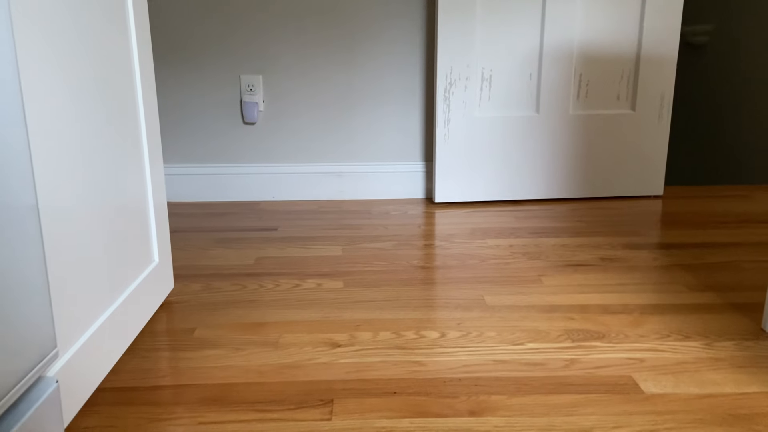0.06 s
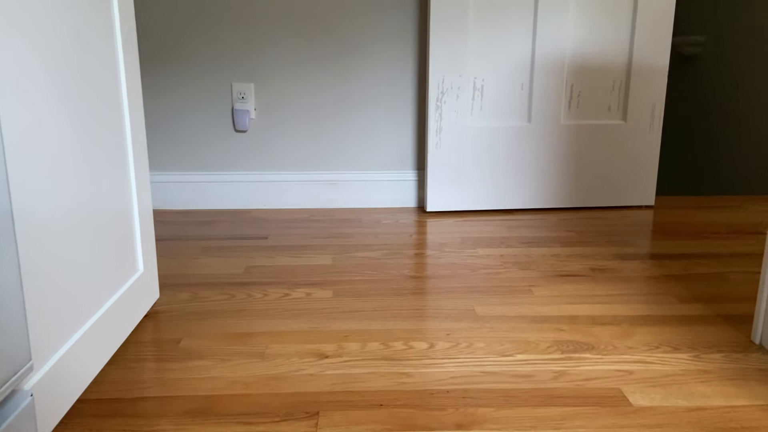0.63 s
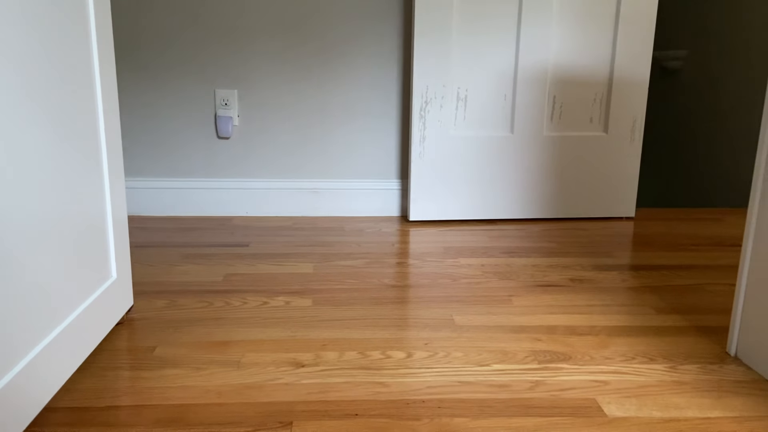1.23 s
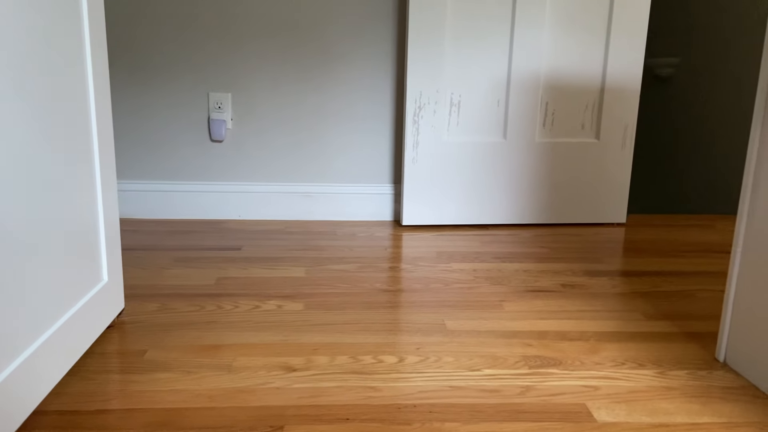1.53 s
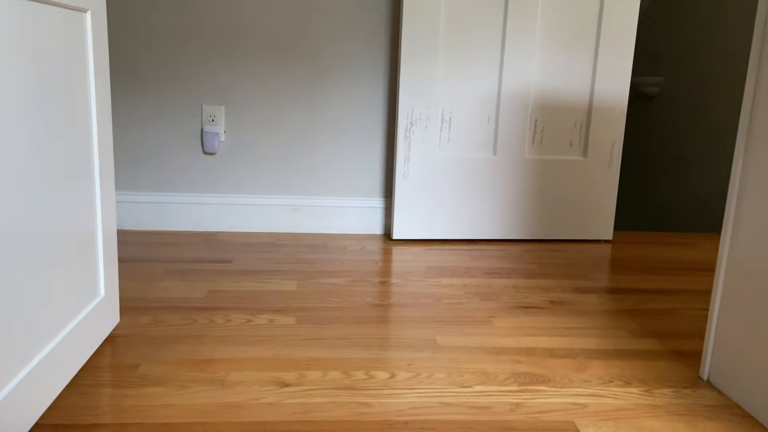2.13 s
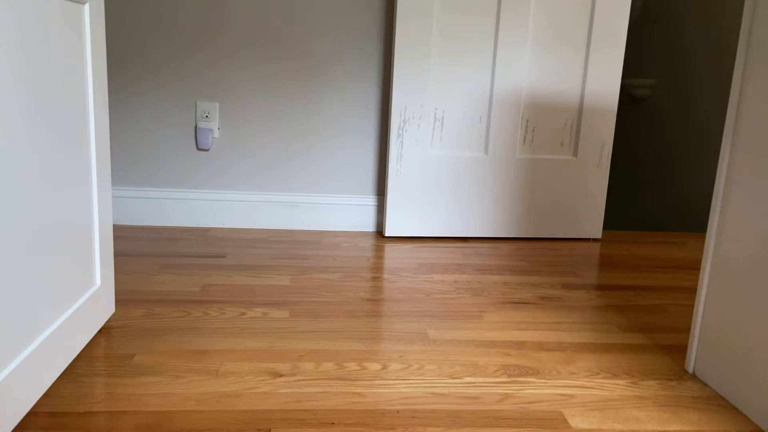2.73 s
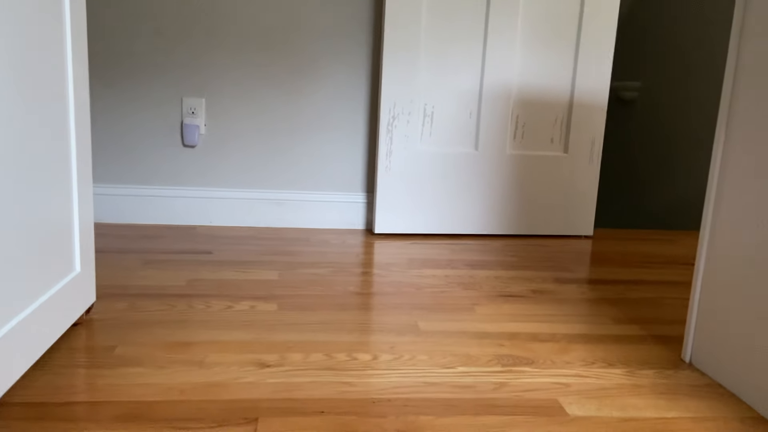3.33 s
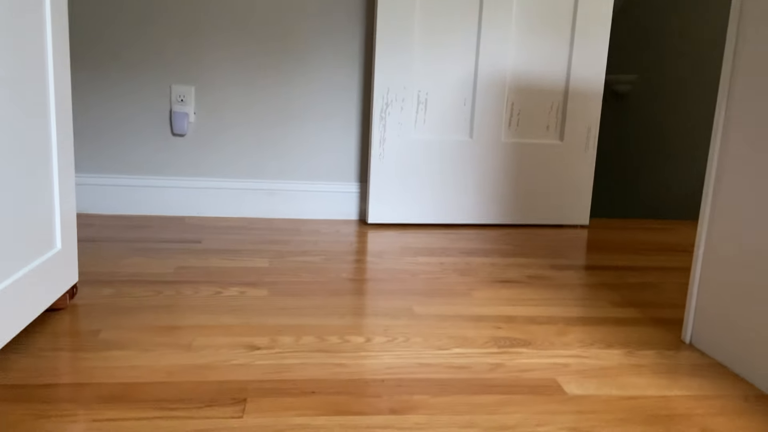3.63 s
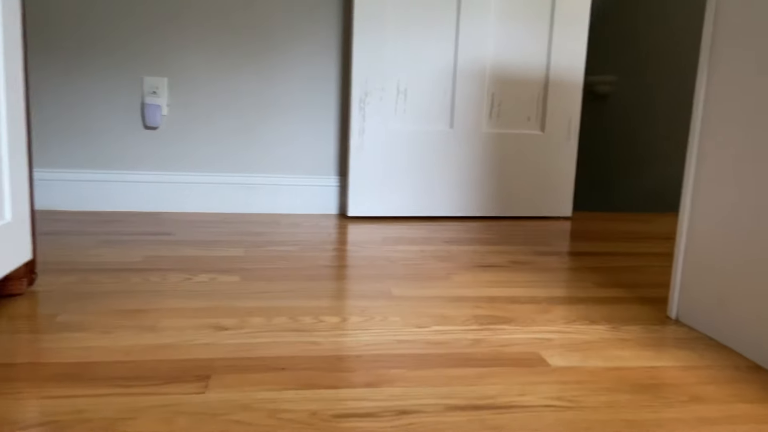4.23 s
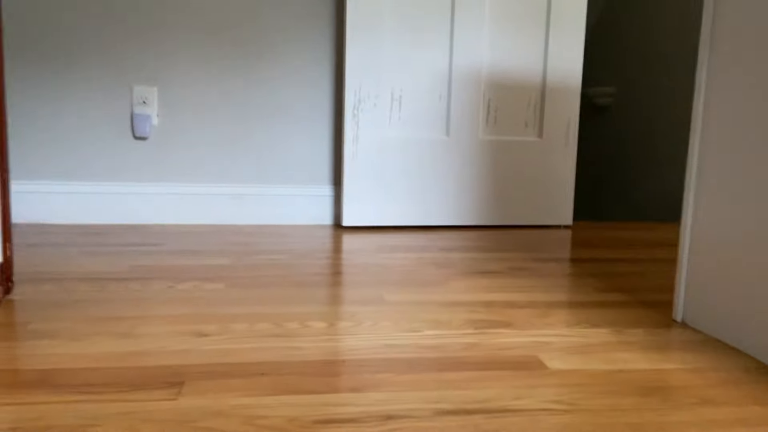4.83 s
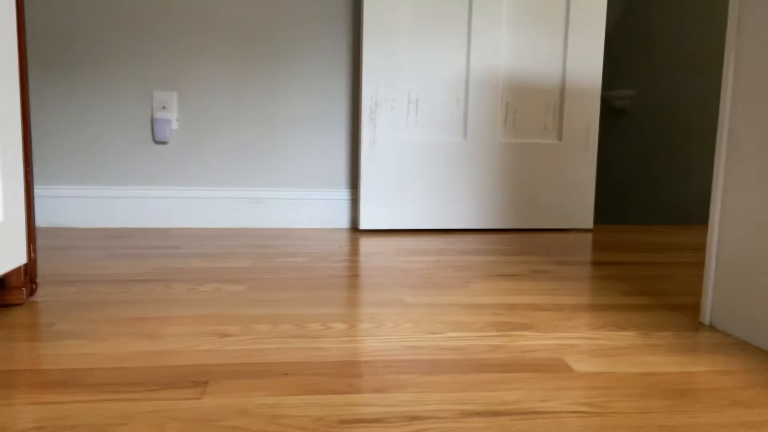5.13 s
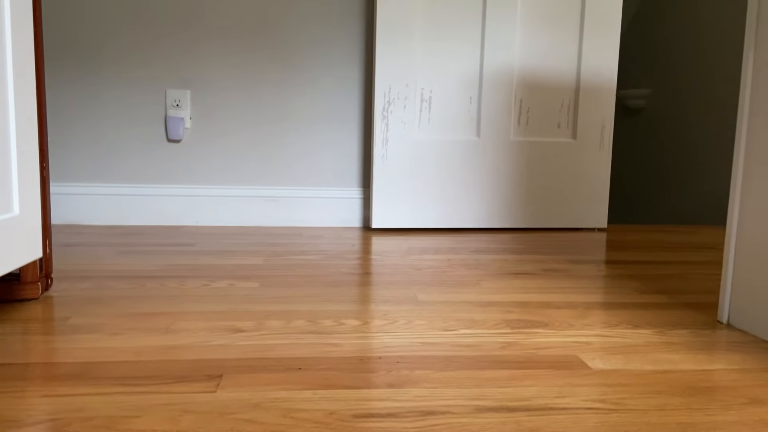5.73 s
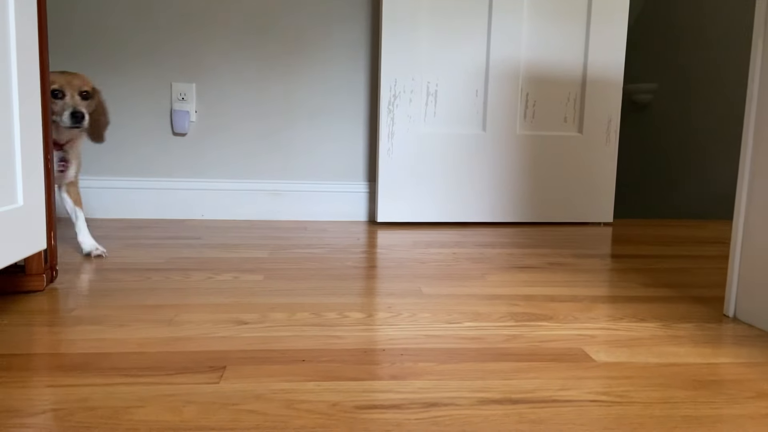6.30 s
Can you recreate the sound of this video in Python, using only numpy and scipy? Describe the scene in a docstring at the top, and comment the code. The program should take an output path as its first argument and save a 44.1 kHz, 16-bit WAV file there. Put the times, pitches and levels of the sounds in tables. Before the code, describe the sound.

A dog moves about on a wooden floor in a slightly echoing kitchen. In the first second, a few claw taps and light paw scuffs mix with hollow wooden bumps from across the room, and metal collar tags clink brightly from about 0.3 to 1 second. A short, heavy floor thump comes at 1.3 seconds. At 1.9 seconds a wooden door knocks hard, the loudest sound, with a few lighter rebounds. From 2.3 to about 5.2 seconds, small dry creaks tick close by, thickest between 3 and 4 seconds, while paws stick and slide, most strongly around 4 seconds. From 4.5 seconds until the end at about 6.4, claws click irregularly, heard mostly from around a corner, with more hollow bumps near 5 and 5.5 seconds. Soft low thuds recur throughout, over a quiet house rumble and the faint rub of a hand on the microphone.

```python
"""A bare kitchen with a wooden floor, where a dog shuffles about.
Its claws tap the boards, its paws stick and slip as they slide, and its metal collar tags clink.
The floor thumps, a wooden door knocks, and hollow bumps come from across the room, which echoes.
Small dry creaks and soft thuds sound close by. Underneath, the house hums with a low rumble
and a hand rubs on the camera that holds the two microphones."""
import sys
import numpy as np
from scipy import signal
from scipy.fft import rfft, irfft
from scipy.io import wavfile
from scipy.ndimage import uniform_filter1d

SR = 44100
rng = np.random.default_rng(int(sys.argv[2]) if len(sys.argv) > 2 else 0)


def generate_wav(sig):
    """Save sig (samples, or channels by samples) to the path in sys.argv[1] as 16-bit PCM at SR."""
    pcm = np.round(np.clip(np.atleast_2d(sig).T, -1, 1) * 32767).astype(np.int16)
    wavfile.write(sys.argv[1], SR, pcm)


N = 280476
SIZE = 8192  # samples in one short sound
T = np.arange(SIZE) / SR
HZ, TRACK_HZ = np.fft.rfftfreq(SIZE, 1 / SR), np.fft.rfftfreq(N, 1 / SR)
USUAL_DB = -46  # a step above this level counts as a hard one
# tone of the paws as the dog moves about: t/s, body (lows)/dB, air (highs)/dB
PAW_TONE = [(0.1, 0, -19.5), (0.5, -0.5, -29), (1.0, 1.5, -12), (1.32, 4, -27), (1.36, 20.5, -14.5),
            (1.54, 5, -10.5), (2.1, 6, -24.5), (2.8, -7.5, -23), (3.6, -1, -21.5), (4.05, -12, -23.5),
            (4.25, 0.5, -16), (5.0, 0.5, -29), (5.5, -10, -26), (6.3, -13, -24)]


def amp(db):
    return 10 ** (np.asarray(db) / 20)


def read(points, hz):
    """Joins (frequency, value) points on a log-frequency axis."""
    f, value = np.transpose(points)
    return np.interp(np.log(hz + 1), np.log(f + 1), value)


def at(curve, s, column=1):
    """Reads one column of a curve at time s."""
    columns = np.transpose(curve)
    return np.interp(s, columns[0], columns[column])


def add(mix, s, sound):
    """Lays a sound into the mix at time s."""
    part = mix[..., max(round(s * SR), 0):][..., :sound.shape[-1]]
    part += sound[..., :part.shape[-1]]


def coloured(x, db):
    """Filters a short sound by the gains db at HZ, so that any ringing follows the hit."""
    log_gain = np.log(amp(np.r_[db, db[-2:0:-1]]))
    return irfft(rfft(x) * np.exp(np.conj(signal.hilbert(log_gain)))[:len(db)])


def tinted(x, points):
    """Filters a whole track by points of f/Hz, gain/dB."""
    return irfft(rfft(x) * amp(read(points, TRACK_HZ)), N)


def levelled(x, band=(20, 20000), size=256):
    """Scales a sound so that its loudest moment within a band has level 1 (rms)."""
    part = irfft(rfft(x) * ((HZ > band[0]) & (HZ < band[1])))
    power = uniform_filter1d(np.atleast_2d(part ** 2).mean(0), size)
    return x / np.sqrt(power.max() + 1e-20)


def octaves_from(hz):
    return np.log2((HZ + 1) / hz)


def grains(per_s, spread_db):
    """A train of tiny slips of uneven size."""
    size = amp(spread_db * np.minimum(rng.exponential(1, SIZE), 4))
    return size * rng.standard_normal(SIZE) * (rng.random(SIZE) < per_s / SR)


def stereo_noise(length):
    """Noise as two close microphones hear it: most alike in the bass."""
    # how alike left and right are: f/Hz, likeness (0 to 1)
    likeness = [(60, 0.75), (200, 0.65), (500, 0.49), (1400, 0.03), (2500, 0.25), (4200, 0.5), (6000, 0.37)]
    a, b = rfft(rng.standard_normal((2, length)))
    same = read(likeness, np.fft.rfftfreq(length, 1 / SR))
    return irfft(np.array([a, same * a + np.sqrt(1 - same ** 2) * b]), length)


def room(x, early_db, tail_db, early_s):
    """Quick echoes from floor and cupboards, then a tail whose highs die first."""
    # how long the kitchen rings: f/Hz, time to fade by 60 dB/s
    fade_times = [(100, 0.96), (400, 0.57), (900, 0.65), (2000, 0.56), (5000, 0.6), (11000, 0.42),
                  (16000, 0.12)]
    t = np.arange(SR) / SR
    early = stereo_noise(SR) * np.exp(-t / early_s) * (t > .001)
    hz, when, bands = signal.stft(stereo_noise(SR), SR, nperseg=256)
    bands *= amp(-60 * when / read(fade_times, hz)[:, None])
    tail = signal.istft(bands, SR, nperseg=256)[1][:, :SR] * (1 - np.exp(-t / 0.006))
    echo = amp(early_db) * early / np.linalg.norm(early[0])
    echo += amp(tail_db) * tail / np.linalg.norm(tail[0])
    return signal.fftconvolve(x[None], echo, axes=1)[:, :N]


def room_tone(level_db=-65):
    """Low steady rumble of the house under a faint hiss."""
    # tone of the quiet house: f/Hz, level/dB
    house_tone = [(20, -2.5), (40, -15.5), (60, 9), (80, -3.5), (115, 2.5), (160, -21), (300, -14),
                  (700, -15.5), (1500, -38.5), (4000, -29.5), (9000, -35.5), (16000, -77)]
    rumble = tinted(stereo_noise(N), house_tone)
    return amp(level_db) * rumble / rumble.std()


def hand_rub(gain_db=-3):
    """Low rubbing that comes and goes as a hand shifts on the camera."""
    # strength of the rubbing: t/s, level/dB
    strength = [(0.0, -45.5), (0.35, -61), (0.78, -56), (1.15, -65.5), (1.75, -65.5), (1.95, -45.5),
                (2.2, -68.5), (3.4, -65.5), (3.7, -61), (4.05, -57.5), (4.4, -65), (6.0, -64), (6.36, -74)]
    # its tone: f/Hz, level/dB
    rub_tone = [(25, -53), (55, 4.5), (130, 1.5), (200, -2.5), (400, -8.5), (800, -10), (2000, -19.5),
                (8000, -31.5)]
    rub = tinted(stereo_noise(N), rub_tone)
    return amp(gain_db + at(strength, np.arange(N) / SR)) * rub / rub.std()


def soft_notes(blows, decay_s, waver, rise_s=.006):
    """Soft blows that each ring one short, slightly unsteady note."""
    out = np.zeros(N)
    for s, db, hz, *_ in blows:
        drift = uniform_filter1d(rng.standard_normal(SIZE), size=200) * np.sqrt(200)
        ring = np.sin(2 * np.pi * np.cumsum(hz * (1 + waver * drift)) / SR)
        add(out, s, amp(db) * levelled(ring * (1 - np.exp(-T / rise_s)) * np.exp(-T / decay_s)))
    return out


def thuds():
    """Weight comes down on the floor and shakes the camera."""
    # soft low thuds: t/s, level/dB, f/Hz
    blows = [(0.105, -48, 143), (0.11, -39.5, 75.4), (0.644, -56, 198), (0.709, -45.5, 79),
             (1.385, -44, 72), (1.66, -48.5, 61), (1.914, -52, 133), (1.925, -49, 75), (1.92, -50, 253),
             (1.995, -56, 288), (2.052, -47.5, 315), (2.16, -47, 382), (2.524, -58, 256),
             (2.914, -52, 61.6), (2.938, -52, 80), (2.996, -51.5, 77), (3.255, -58, 125),
             (3.619, -54.5, 130), (4.12, -55, 125), (4.78, -56, 81.4), (5.89, -59, 93), (6.249, -56, 62),
             (6.325, -54, 70)]
    out = soft_notes(blows, decay_s=0.0078, waver=.1)
    return out + room(out, early_db=-9, tail_db=-11, early_s=.015)


def bumps(gain_db=-7.5):
    """Hollow wooden notes from across the room, each with a rough knock and a higher clack."""
    # bumps on wood: t/s, level/dB, note/Hz, clack against level/dB, clack/Hz
    blows = [(0.101, -38.5, 693, -7, 1760), (0.456, -50, 704, 8, 2040), (0.533, -39, 741, -14, 1990),
             (0.933, -41, 711, -6, 1877), (3.625, -44, 907, 3.5, 3050), (5.022, -43.5, 947, -4, 2990),
             (5.098, -51.5, 970, 3.5, 2970), (5.497, -41.5, 892, -4.5, 2890)]
    out = amp(-3) * soft_notes(blows, decay_s=.0065, waver=.05)
    for s, db, hz, clack_db, clack_hz in blows:
        knock_tone = -20 * np.log10(1 + (octaves_from(hz) / 0.28) ** 2)
        knock = coloured(grains(2500, 1.6) * np.exp(-T / 0.009), knock_tone)
        add(out, s, amp(db - 2) * levelled(knock))
        clack_tone = -10 * np.log10(1 + (octaves_from(clack_hz) / 0.028) ** 2)
        clack_tone += read([(4000, -6.5), (9000, -0.5)], HZ)
        clack = coloured(grains(5500, 1.6) * np.exp(-T / 0.0061), clack_tone)
        add(out, s, amp(db + clack_db) * levelled(clack))
    return amp(gain_db) * (out + room(out, early_db=0.5, tail_db=-2, early_s=0.016))


def creaks(gain_db=-8.5, snap_s=0.0031, wood_db=-29, wood_s=0.0072):
    """Single slips in wood close by; the wood bends in waves that bring the highs before the lows."""
    # dry creaks: t/s, level/dB, treble/dB, delay at 1 kHz/s
    slips = [(0.642, -43.5, 0.5, 0.00197), (0.703, -30.5, -8.5, 0.00218), (2.29, -37, 0.5, 0.00172),
             (2.3533, -41.5, 3, 0.00156), (2.3836, -35, 1.5, 0.0016), (2.4195, -44.5, -10, 0.00137),
             (2.457, -42.5, 4, 0.00126), (2.6674, -42, 2, 0.00168), (2.9108, -36.5, 8.5, 0.0015),
             (2.986, -41, 2, 0.0021), (3.069, -52, 8, .003), (3.0853, -46, 9.5, .003),
             (3.0899, -45, -13, 0.0021), (3.1447, -48, -21, 0.00217), (3.186, -54, -18, 0.0037),
             (3.2086, -44.5, -4, 0.0031), (3.237, -47.5, -2, 0.0055), (3.3173, -45, 8, 0.00241),
             (3.368, -46.5, 13.5, 0.00256), (3.386, -50.5, 14, 0.0056), (3.409, -47, 14.5, .0022),
             (3.4361, -45, 9, .0024), (3.447, -51, 5, 0.00207), (3.5106, -46, 9, 0.0054),
             (3.5278, -50, 8, 0.0031), (3.554, -43.5, 6, 0.00243), (3.573, -48, 4, 0.00295),
             (3.627, -53, 7, .003), (3.639, -41, 2, 0.00288), (3.6674, -41.5, 8, 0.0043),
             (3.6867, -43.5, 11, 0.0049), (3.714, -43, 9, 0.0028), (3.7285, -46, 0, 0.0041),
             (3.7424, -47, -5, .0034), (3.7713, -45.5, 12, 0.00201), (3.785, -48, 9, .0036),
             (3.809, -43.5, 9, 0.0027), (3.8434, -46, 7, 0.00195), (3.8526, -43.5, 2, 0.0033),
             (3.8882, -49, 26, 0.00189), (3.905, -53, -5, 0.00363), (3.9574, -47, 2, 0.00256),
             (4.0118, -42, 13, 0.0026), (4.056, -42.5, 9, .0024), (4.069, -46.5, 6, 0.0023),
             (4.0805, -49, 12, 0.0019), (4.0908, -46.5, 2, 0.0034), (4.1888, -44.5, 8, 0.0019),
             (4.48, -50, 9, 0.00285), (4.4958, -43, 12, 0.00227), (4.6004, -38.5, 14.5, 0.00168),
             (4.6837, -39, 8.5, 0.00195), (4.829, -42, 6, 0.00298), (4.928, -46, 2, 0.00298),
             (4.99, -44.5, 4, 0.00159), (5.065, -43, 6, .0026), (5.115, -39.5, 0, 0.00162),
             (5.2344, -48.5, 1.5, .0013), (5.992, -52.5, 0, 0.00144)]
    # tone of a creak: f/Hz, level/dB
    creak_tone = [(80, 3.5), (250, 3.5), (500, 15.5), (900, 10), (1600, 8.5), (3000, -0.5), (7000, -6),
                  (11000, -16), (16000, -26)]
    out = np.zeros((2, N))
    dull = read([(150, 6), (800, 0), (3000, -22)], HZ)
    for s, db, treble_db, lag_s in slips:
        slip = 0.11 * rng.standard_normal((2, SIZE)) * np.exp(-T / snap_s)
        slip[:, 0] += 1  # the first sharp snap
        slip += amp(wood_db) * coloured(rng.standard_normal(SIZE) * np.exp(-T / wood_s), dull)
        tone = read(creak_tone, HZ) + read([(1500, 0), (4000, treble_db)], HZ)
        bending = np.exp(-4j * np.pi * lag_s * np.sqrt(1000 * HZ))
        click = irfft(rfft(coloured(slip, tone)) * bending)
        add(out, s, amp(db) * levelled(click, band=(400, 3000), size=176))
    return amp(gain_db) * out


def struck_wood(blows, notes, crack_db, crack_s, spread, top_db, low_hz, rise_s):
    """A blow rings the wood's own notes; long contact weakens the highs, a hit near the edge the lows."""
    out = np.zeros((2, N))
    for s, db, contact_s, low_db in blows:
        ring = amp(crack_db) * stereo_noise(SIZE) * np.exp(-T / crack_s)
        for hz, note_db, fade_s in notes:
            # each note reaches the two microphones a little out of step
            turns = rng.random() + spread * rng.uniform(1.0, 1.64) * np.array([[0], [1]])
            ring += amp(note_db - 60 * T / fade_s) * np.sin(2 * np.pi * (hz * T + turns))
        tone = -10 * np.log10(1 + (2 * np.pi * HZ * contact_s) ** 2)
        tone += read([(low_hz, low_db), (1.4 * low_hz, 0), (5000, 0), (10000, top_db)], HZ)
        add(out, s, amp(db) * levelled(coloured(ring * (1 - np.exp(-T / rise_s)), tone)))
    return out


def floor_thump():
    """A short, heavy thump in the boards, with lighter hits around it."""
    # blows on the floor: t/s, level/dB, contact time/s, lows/dB
    blows = [(1.321, -47.5, 0.00049, 0), (1.3315, -31, 0.00083, 0.5), (1.356, -45, 0.00023, -9),
             (1.366, -46.5, 0.00017, -10), (1.382, -43.5, 0.000084, -10.5)]
    # notes of the boards: f/Hz, level/dB, time to fade by 60 dB/s
    notes = [(128, -3.5, 0.089), (298, 0, 0.028), (545, 5.5, 0.024), (625, -0.5, 0.056), (710, 0, 0.054),
             (854, -10.5, 0.077), (1072, -8, 0.1), (1220, -20, 0.049), (1770, -13, 0.11)]
    out = struck_wood(blows, notes, crack_db=-1, crack_s=0.016, spread=0.08,
                      top_db=-30, low_hz=580, rise_s=.002)
    return amp(-1) * out + room(out.mean(0), early_db=-6, tail_db=-6, early_s=0.017)


def door_knock():
    """A hard wooden knock and its rebounds; the room takes up some notes more than others."""
    # knocks of the door: t/s, level/dB, contact time/s, lows/dB
    blows = [(1.9008, -19.5, 0.000087, -0.5), (1.926, -37, 0.0003, 2), (2.054, -44, 0.0007, 0),
             (2.152, -39, 0.000024, -4)]
    # notes of the door: f/Hz, level/dB, time to fade by 60 dB/s
    notes = [(350, -17, 0.053), (724.5, -4.5, 0.12), (757, 3, 0.051), (836, -13.5, 0.126),
             (878, -8.5, 0.055), (940, -6, 0.076), (995, 4.5, 0.026), (1108, -1, 0.031), (1230, -1, 0.023),
             (1390, -6, 0.027), (1500, -20, 0.13), (1796, -19.5, 0.2), (1912, -5, 0.03),
             (1990, -23.5, 0.17), (2275, -23, 0.065), (2360, -17, 0.053), (2570, -11, 0.023)]
    # what the room takes up: f/Hz, gain/dB
    into_room = [(350, -8), (720, 0.5), (850, 4), (1000, -7), (1150, -2), (1800, 5.5), (2030, 11.5),
                 (2400, 5.5), (4000, 4)]
    out = struck_wood(blows, notes, crack_db=-11, crack_s=0.012, spread=0.19,
                      top_db=-5, low_hz=780, rise_s=.005)
    return amp(-1) * out + room(tinted(out.mean(0), into_room), early_db=-9, tail_db=-6.5, early_s=0.02)


def collar_tags(gain_db=-3.5, upper_s=0.003, lower_s=0.0019, tick_s=0.002):
    """Two small metal discs touch with a bright tick and stop each other's ringing at once."""
    # clinks: t/s, upper ring/dB, lower ring/dB, lower ring/Hz, room share/dB, tick share/dB
    clinks = [(0.009, -58, -59, 7700, 15, -2), (0.318, -58.5, -54.5, 7670, 11, 12),
              (0.364, -52, -52, 8340, 7, 12), (0.455, -51, -58, 8300, -1, 12),
              (0.465, -42, -42, 8500, 3.5, 9), (0.477, -46, -34, 8380, -4.5, -7),
              (0.6383, -30, -73, 7900, -5, -6), (0.652, -30, -72, 7950, -22, -6),
              (0.747, -59, -48, 7400, 6, 14), (0.758, -66, -49, 8100, 4, 5),
              (0.791, -45, -60, 8450, -3, 14), (0.867, -48, -29, 8360, -6, -5),
              (0.875, -45, -46, 8450, -14, 9), (0.882, -52, -40, 8300, -15, -7),
              (0.945, -41, -33, 8040, -5, 5.5), (0.957, -37.5, -40, 8500, 1.5, 5.5),
              (0.981, -47, -40, 8200, -13, -8), (1.026, -64, -65, 7930, 17, 6),
              (1.789, -96, -66.5, 7630, 13, 3)]
    near, far = np.zeros((2, N))
    for s, db, lower_ring_db, lower_hz, room_db, tick_db in clinks:
        upper_hz = 11390 * (1 + 0.003 * rng.uniform(-1, 1))
        lower_db = lower_ring_db - db
        ring = np.sin(2 * np.pi * upper_hz * T) * np.exp(-T / upper_s)
        ring += amp(lower_db) * np.sin(2 * np.pi * lower_hz * T) * np.exp(-T / lower_s)
        ring *= 1 - np.exp(-(T / .0003) ** 2)
        # the tick is noise spread round the two rings
        bright = read([(4000, -30), (8400, max(lower_db, -20)), (11400, 0), (12800, -1), (16000, -8)], HZ)
        tick = coloured(rng.standard_normal(SIZE) * np.exp(-T / tick_s), bright)
        clink = amp(db) * (2 * ring + amp(tick_db) * tick)
        add(near, s, clink)
        add(far, s, amp(room_db) * clink)
    return amp(gain_db) * (near + room(far, early_db=-5, tail_db=-1, early_s=.012))


def claw_on_board(force, db, body_db, air_db, extra_db=0):
    """A claw's push turns into sound, dull or bright as the paw lands; hard steps ring more."""
    # tone of claw on wood: f/Hz, level/dB
    claw_tone = [(60, -8.5), (150, -4), (350, 2.5), (600, -2.5), (900, 4), (1400, 5), (2200, 6), (3100, 2),
                 (4800, 2.5), (6400, -2), (7400, 0), (8500, 7), (9500, 16.5), (11000, 13.5), (15500, 8.5)]
    # pitches that a claw sets ringing: f/Hz, height before scaling by the step's strength/dB
    rings = [(3050, 3.5), (3600, 2.5), (4730, 4), (6750, 1.5), (7900, 2.5)]
    tilt = read([(1300, body_db), (3000, 0), (7000, 0), (10500, air_db)], HZ)
    peaks = sum(height * np.exp(-(octaves_from(hz) / 0.082) ** 2) for hz, height in rings)
    bite = 0.03 * max(db - USUAL_DB, 0) * peaks
    tone = read(claw_tone, HZ) + tilt + bite + extra_db
    return amp(db) * levelled(coloured(force, tone), band=(2500, 8000))


def small_steps(start_s=2.65, end_s=6.1, count=14, db=-51, length_s=0.14, ring_hz=5000):
    """Lists the dog's light, restless scuffs, at an uneven pace."""
    jitter, size = rng.random((count, 2)).T
    times = start_s + (end_s - start_s) * (np.arange(count) + jitter) / count
    levels = db + 2 * (2 * size - 1)
    return [(s, level, length_s, ring_hz) for s, level in zip(times, levels)]


def paw_scuffs(gain_db=-8, ring_octaves=0.59):
    """A sliding paw sticks and slips; each stroke swells and eases, and hard ones sound thinner."""
    # slides: t/s, level/dB, length (cut off at SIZE samples)/s, ringing pitch/Hz
    slides = [(0.003, -43.5, 0.11, 3570), (0.227, -47.5, 0.11, 4550), (0.462, -42.5, 0.034, 5150),
              (0.755, -53, 0.31, 5000), (0.871, -49.5, 0.077, 5200), (0.922, -47, 0.05, 5000),
              (1.354, -51.5, 0.035, 4000), (2.11, -47.5, 0.093, 5170), (2.40, -50.5, 0.073, 4800),
              (2.615, -50, 0.12, 5060), (2.76, -77, 0.091, 5400), (2.86, -51.5, 0.11, 3400),
              (2.972, -46.5, 0.064, 4900), (3.17, -55, 0.28, 3600), (3.236, -44, 0.075, 4700),
              (3.402, -59, 0.031, 5600), (3.552, -41, 0.16, 3980), (3.62, -46.5, 0.24, 3160),
              (3.745, -47, 0.19, 4730), (3.89, -40.5, 0.05, 5260), (3.928, -35.5, 0.058, 4460),
              (4.0, -39.5, 0.11, 5140), (4.223, -33.5, 0.061, 4270), (4.471, -52, 0.035, 4500),
              (4.6845, -46.5, 0.23, 2700), (4.77, -53, 0.038, 4950), (4.881, -43, 0.043, 4460),
              (5.005, -39, 0.054, 3000), (5.32, -47, 0.071, 4570), (5.463, -48, 0.066, 2800),
              (5.55, -52, 0.086, 3000), (5.667, -56, 0.17, 3400), (5.791, -51.5, 0.021, 3000),
              (6.119, -51, 0.094, 5240), (6.326, -45, 0.018, 4500)]
    spots = np.zeros((2, N))  # two places on the floor, each with its own echoes
    soft_top = read([(11500, 0), (14500, -6)], HZ)
    for k, (s, db, length_s, hz) in enumerate(list(slides) + small_steps()):
        hard_db = db - USUAL_DB
        swell = np.sin(np.pi * np.minimum(T / length_s, 1) ** 0.75)
        force = grains(1900, 1.94) * swell
        ring_db = max(3 + 0.39 * hard_db, 0) * np.exp(-(octaves_from(hz) / ring_octaves) ** 2)
        body_db = at(PAW_TONE, s) - 0.32 * hard_db
        air_db = at(PAW_TONE, s, column=2)
        add(spots[k % 2], s, claw_on_board(force, db, body_db, air_db, ring_db + soft_top))
    return amp(gain_db) * sum(room(spot, early_db=1.0, tail_db=-3.5, early_s=0.0028) for spot in spots)


def claw_taps(gain_db=-2.0, strike_s=0.00041, rise_s=0.00088, chatter_s=0.0099):
    """Each claw strikes sharply and chatters to rest; most of it arrives round a corner as echo."""
    # claws hitting the boards: t/s, level/dB, body (lows)/dB, share heard directly/dB
    hits = [(0.1003, -38, 6, -18), (0.4537, -45.5, 1, -5), (1.319, -55, 12, -14), (1.5372, -61.5, -7, -6),
            (1.9043, -38, 15.5, -10), (2.0529, -50, 11.5, -7), (2.667, -59.5, 12, -2),
            (3.538, -40.5, -28, -9.5), (3.621, -48, 7, -9), (4.4969, -42, -11.5, -13),
            (4.507, -38.5, -21, -15), (4.599, -52.5, 2, -14), (4.681, -47.5, 8.5, -12),
            (4.7568, -27.5, -24, -16), (4.8819, -42.5, -9, -11), (4.8876, -40, -5, -6),
            (4.906, -50, -6, -13), (5.0185, -49, 0, -14), (5.0292, -52, 2, -10), (5.4906, -57.5, 9, -8),
            (5.558, -49, -5, -10), (5.7618, -42, -5.5, -12), (5.864, -47.5, -5.5, -21),
            (6.048, -51.5, 0.5, -2.5), (6.0636, -45, -8, -15), (6.133, -54, -17, -3),
            (6.2286, -45, -2, -27), (6.3122, -42.5, -7.5, -6), (6.3276, -47.5, -3, -18)]
    strike = 2.9 * np.exp(-T / strike_s)
    chatter = (1 - np.exp(-T / rise_s)) * np.exp(-T / chatter_s)
    near, far = np.zeros((2, N))
    for s, db, body_db, direct_db in hits:
        force = grains(7000, 5.2) * (strike + chatter)
        tap = claw_on_board(force, db, body_db, air_db=2 + at(PAW_TONE, s, column=2))
        add(near, s, amp(direct_db) * tap)
        add(far, s, tap)
    return amp(gain_db) * (near + room(far, early_db=-4, tail_db=-4.5, early_s=.006))


def scene():
    dog = claw_taps() + paw_scuffs() + collar_tags()
    wood = creaks() + thuds() + bumps() + door_knock() + floor_thump()
    return dog + wood + hand_rub() + room_tone()


def record(dry, low_cut_hz=40, high_cut_hz=15950):
    """The camera trims both ends of the range and puts one treble signal on both sides, out of step."""
    # widening of the treble: f/Hz, lead of the right side/cycles
    widening = [(7400, 0), (7900, .24), (8300, .33), (8750, .49), (9400, .51), (10000, .7), (10550, .96),
                (11650, 1), (12650, 1.5), (13700, 1.5), (14700, 2)]
    # lean to one side: f/Hz, left minus right/dB
    balance = [(100, .5), (700, 2), (1000, -2.5), (1700, -1.5), (2300, 2), (3300, 2.5), (5000, 1),
               (7000, 0)]
    low_cut = signal.butter(3, low_cut_hz, "high", fs=SR, output="sos")
    left, right = rfft(signal.sosfilt(low_cut, dry))
    shared = np.clip((TRACK_HZ - 5800) / 900, 0, 1)
    right = (1 - shared) * right + shared * left
    right *= np.exp(2j * np.pi * read(widening, TRACK_HZ))
    lean = amp(read(balance, TRACK_HZ) / 2)
    out = irfft(np.array([left * lean, right / lean]), N)
    high_cut = signal.firwin(511, high_cut_hz, window=("kaiser", 9), fs=SR)
    return signal.oaconvolve(out, high_cut[None], "same")


dry = scene()
out = record(dry)
generate_wav(out)
```